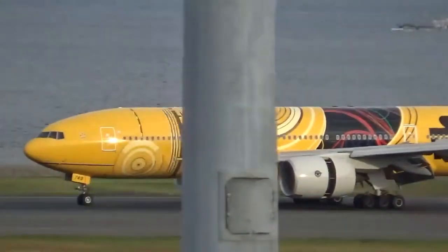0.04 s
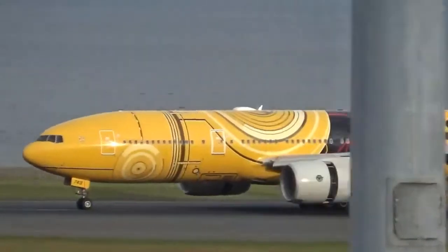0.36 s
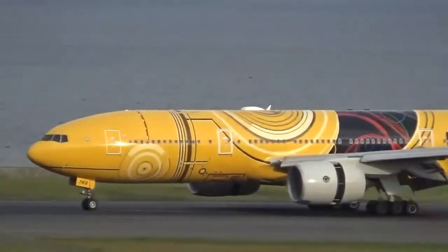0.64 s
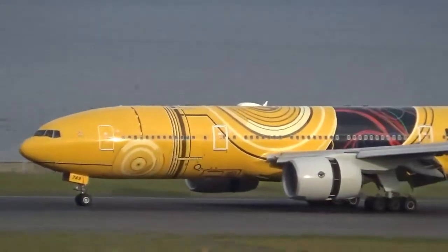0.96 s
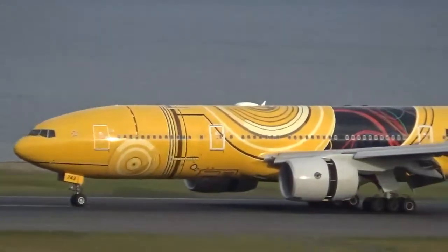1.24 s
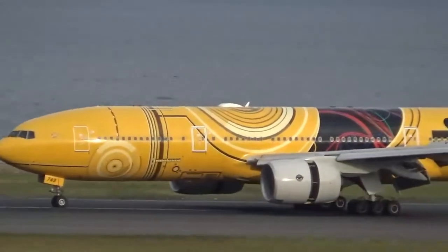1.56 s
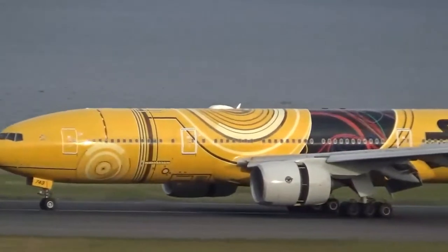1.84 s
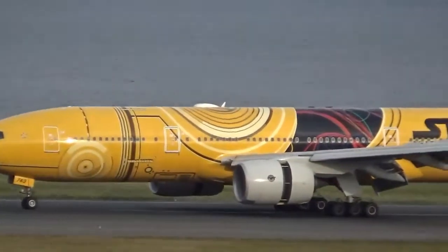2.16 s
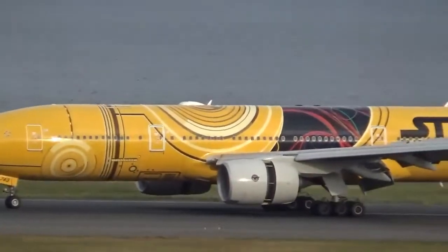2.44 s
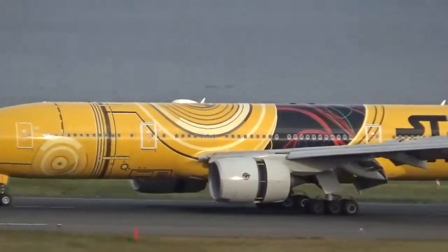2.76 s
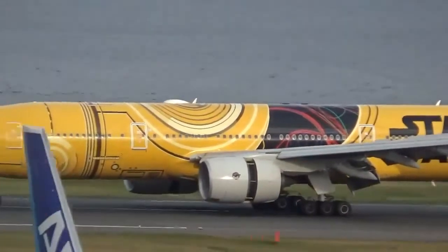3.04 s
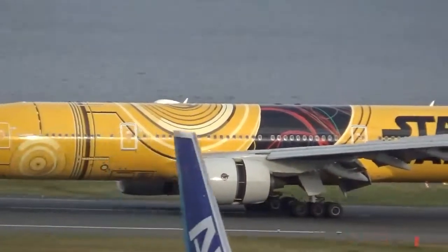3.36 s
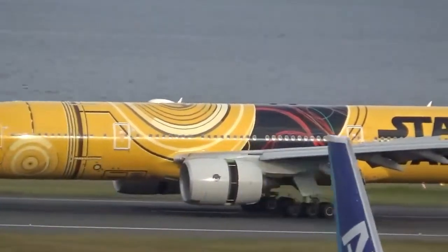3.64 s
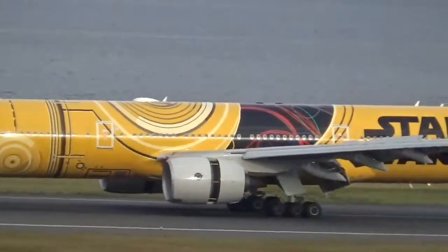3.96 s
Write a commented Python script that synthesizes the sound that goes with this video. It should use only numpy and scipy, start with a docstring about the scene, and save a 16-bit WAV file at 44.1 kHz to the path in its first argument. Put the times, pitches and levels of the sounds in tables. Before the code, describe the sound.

A steady jet engine roar with thin high whines from an airliner on a runway.

```python
"""An airliner rolls along a runway, heard from afar among other jets with their engines at idle.
From the start the exhausts rumble and roar, the intakes rush and hiss, and thin blade tones sink
very slowly in pitch, fading in and out in the moving air. Short puffs of hiss pass at 0.2 and 1.5 s.
Then the deepest rumble grows and low hums swell in turn. From 3 s a high whine is at its loudest."""
import sys
import numpy as np
from scipy import signal
from scipy.fft import rfft, irfft, next_fast_len
from scipy.io import wavfile
from scipy.ndimage import uniform_filter1d, minimum_filter1d, map_coordinates

SR = 44100
rng = np.random.default_rng(int(sys.argv[2]) if len(sys.argv) > 2 else 0)


def transcribe(u):
    """Save the signal u as a 16-bit wav file named by the first command-line argument.

    u: samples, shape (n,) or (channels, n), limited to [-1, 1]; the rate is SR.
    q: integer samples, one column per channel.
    """
    v = np.clip(np.atleast_2d(u).T, -1, 1)
    q = np.round(v * 32767).astype(np.int16)
    wavfile.write(sys.argv[1], SR, q)


N = 176400  # 4 seconds


def amp(db):
    """Turn decibels into a gain to multiply by."""
    return 10 ** (np.asarray(db) / 20)


def unit(x):
    """Scale a signal to an average (rms) level of 1."""
    return x / np.sqrt(np.mean(x ** 2) + 1e-20)


def along(points, hz):
    """Read between the rows of a (Hz, value) table, on a log frequency scale."""
    freqs, values = np.transpose(points)
    return np.interp(np.log(hz + 1), np.log(freqs + 1), values)


def curve(rows):
    """Join (seconds, value) rows with straight lines, one value per sample."""
    return np.interp(np.arange(N) / SR, *np.transpose(rows))


def wobble(rate):
    """A smooth curve through `rate` random points a second."""
    points = rng.standard_normal(int(N * rate / SR) + 4)
    return map_coordinates(points, [np.arange(N) * rate / SR], mode="mirror")


def filtered(x, response):
    """Turn each frequency up or down by the gain response(hz)."""
    size = next_fast_len(N + SR // 2)
    return irfft(rfft(x, size) * response(np.fft.rfftfreq(size, 1 / SR)), size)[..., :N]


def band(hz, half_width_hz):
    """Narrow noise around one pitch, at level 1."""
    return unit(filtered(rng.standard_normal(N), lambda f: 1 / (1 + ((f - hz) / half_width_hz) ** 2)))


# Stereo width. Each row: frequency in Hz, dB of what differs between the ears against what they share.
STEREO_WIDTH = [(30, -26), (80, -30.5), (130, -31), (200, -25.5), (400, -24.5), (600, -28), (900, -33),
                (1300, -26), (1900, -25.5), (2700, -20.5), (4000, -15.5), (5900, -13.5), (7500, -9),
                (8600, -5.5)]
def turbulence(colour, patchy_db):
    """Swirling air: nearly mono noise at level 1, with random louder and softer patches."""
    spectrum = signal.stft(rng.standard_normal((2, N)), nperseg=512)[2]
    patches = uniform_filter1d(rng.standard_normal(spectrum.shape[1:]), size=7, axis=0)  # blur in pitch
    patches = uniform_filter1d(patches, size=18, axis=1)  # blur in time
    pair = signal.istft(spectrum * amp(patchy_db * unit(patches)), nperseg=512)[1][:, :N]
    mid, side = filtered(
        pair, lambda hz: amp(along(colour, hz)) * [np.ones_like(hz), amp(along(STEREO_WIDTH, hz))])
    return unit(np.array([mid + side, mid - side]))


# The breeze's colour. Each row: frequency in Hz, relative strength in dB.
BREEZE_COLOUR = [(10, -12), (25, 0.5), (50, -4), (90, -16), (200, -40), (400, -100)]
def breeze():
    """A faint low flutter of air on the microphone, different on each side."""
    air = filtered(rng.standard_normal((2, N)), lambda hz: amp(along(BREEZE_COLOUR, hz)))
    return amp(-64 + 3 * wobble(3)) * unit(air)


# The puffs. Each row: peak time in seconds, peak level in dB, rise and fall times in seconds.
PUFFS = [(.21, -29.5, 0.015, .06), (1.526, -28.5, 0.012, 0.028)]
# Their colour. Each row: frequency in Hz, relative strength in dB.
PUFF_COLOUR = [(3500, -39), (4700, -5.5), (5600, 9), (6500, 0), (7500, -9.5), (8300, -19), (9200, -52)]
def puffs():
    """The top of the hiss flares up briefly."""
    t = np.arange(N) / SR
    swell = sum(amp(db) * np.exp(-np.maximum((peak - t) / rise, (t - peak) / fall))
                for peak, db, rise, fall in PUFFS)
    return swell * turbulence(PUFF_COLOUR, patchy_db=-3.0)


# Low hums. Each row: pitch and half width in Hz, peak level in dB, peak time and spread in seconds.
HUMS = [(119.5, 14, -25.5, 2.15, 0.38), (99, 9.7, -28.5, 2.69, 0.22), (387, 42, -24, 2.03, 0.29),
        (356, 39, -21, 2.85, 0.051), (261, 30, -27.5, 3.58, .25)]
# The howl's loudness. Each row: time in seconds, level in dB.
HOWL_LEVEL = [(0, -31), (.3, -24.5), (.7, -30), (1.4, -30), (2.1, -29), (2.45, -26), (2.8, -31),
              (3.08, -24.5), (3.3, -36), (4, -25.5)]
def hums_and_howl():
    """Low hums swell in turn, and a soft howl comes and goes above them."""
    t = np.arange(N) / SR
    hums = sum(amp(db) * np.exp(-.5 * ((t - peak) / spread) ** 2) * band(hz, half_width)
               for hz, half_width, db, peak, spread in HUMS)
    howl = amp(curve(HOWL_LEVEL)) * band(841, half_width_hz=35)
    return hums + howl


# Loudness of the intake's layers, low to high. Each row: time in seconds, level in dB.
RUSH_LEVEL = [(0, -20), (0.2, -24.5), (0.38, -21.0), (0.6, -22.5), (1, -23), (1.25, -19.5), (1.6, -21),
              (1.85, -23.5), (2.3, -22), (2.9, -21.5), (3.4, -21), (3.7, -21.5), (3.9, -20.5), (4, -21.5)]
HISS_LEVEL = [(0, -36), (0.15, -35), (0.58, -33.5), (0.72, -35), (1.1, -37), (1.3, -39), (1.5, -35),
              (1.75, -38), (2.1, -34.5), (2.4, -33.5), (2.75, -34.0), (3.1, -32.5), (3.45, -31.5),
              (3.7, -34), (4, -32)]  # before the boost below
FIZZ_LEVEL = [(0, -48.5), (.25, -40), (.45, -36.5), (.6, -36), (1, -54.5), (1.7, -55), (2, -46), (2.3, -48),
              (3, -43), (3.5, -43.5), (4, -38.5)]
# Their colours. Each row: frequency in Hz, relative strength in dB.
RUSH_COLOUR = [(820, -31), (1400, -5), (1520, -4.5), (1720, -1.5), (1950, -4), (2080, -6.5), (2250, -10),
               (2600, -17), (4000, -120)]
HISS_COLOUR = [(1850, -43), (2150, 0.5), (2400, 4), (2680, 3.5), (2900, 1.5), (3100, 1.5), (3300, 3),
               (3700, -3), (4020, -2.5), (4450, -3.5), (4700, -6), (5750, -7.5), (6500, -14), (7500, -21),
               (8200, -27), (8700, -49), (9200, -48.5), (10000, -68.5)]
FIZZ_COLOUR = [(3200, -39.5), (4600, -5), (5600, 5), (6500, -3.5), (7500, -13), (8200, -23), (9000, -54),
               (10000, -82)]
def intake(hiss_boost_db=8):
    """Broad fan noise. Moving air makes the rush and hiss shimmer together, the fizz on its own."""
    shimmer = unit(wobble(9.9) + wobble(35))
    rush = amp(curve(RUSH_LEVEL) + .35 * shimmer) * turbulence(RUSH_COLOUR, patchy_db=.74)
    hiss = amp(curve(HISS_LEVEL) + hiss_boost_db + .6 * shimmer) * turbulence(HISS_COLOUR, patchy_db=1.04)
    fizz = amp(curve(FIZZ_LEVEL) + wobble(18)) * turbulence(FIZZ_COLOUR, patchy_db=3.5)
    return rush + hiss + fizz


def blade_tone(hz, fall_hz_per_s, flutter_db, waver_hz=1.28):
    """Spinning blades make a slowly sinking tone; the air makes it waver, flutter and fray."""
    from_middle_s = (np.arange(N) - N / 2) / SR
    pitch = hz - fall_hz_per_s * from_middle_s + waver_hz * (wobble(7) + wobble(40))
    phase = 2 * np.pi * np.cumsum(pitch) / SR
    mid = np.sin(phase) * amp(flutter_db * unit(wobble(12) + .7 * wobble(45)))
    side = .04 * (wobble(4) * np.sin(phase) + wobble(4) * np.cos(phase))  # differs between the ears
    scattered = amp(-12) * band(hz, half_width_hz=70)  # swirling air turns some of the tone into noise
    return unit(np.array([mid + side, mid - side])) + scattered


# Loudness of each main tone, low to high. Each row: time in seconds, level in dB.
MOAN_LEVEL = [(0, -30), (.85, -37), (1.05, -25), (1.35, -24), (1.6, -23.5), (1.85, -33), (4, -42)]
FAN_LEVEL = [(0, -42.5), (.3, -35), (.58, -28.5), (1, -39.5), (1.35, -41), (1.7, -35.5), (2.1, -30.5),
             (2.4, -37), (2.88, -32), (3.05, -33.5), (3.3, -29.5), (3.62, -26), (4, -35)]
LOW_LEVEL = [(0, -49), (1.7, -50), (1.83, -38.5), (2.3, -31.5), (2.5, -35), (2.95, -31), (3.55, -32),
             (3.85, -35), (4, -34.5)]
SIDE_LEVEL = [(0, -53.5), (1.4, -54), (2.4, -46), (3, -48.5), (3.35, -43), (3.6, -33), (4, -43)]
TWIN_LEVEL = [(0, -50), (0.8, -50.5), (1.2, -39.5), (1.65, -35), (2.5, -37.5), (3.5, -37.5), (4, -37)]
WHINE_LEVEL = [(0, -37.5), (.35, -39), (.58, -34), (1.15, -33.5), (1.5, -36), (1.65, -32), (1.85, -40),
               (2.02, -28.5), (2.2, -42), (2.42, -32.5), (2.68, -32), (2.83, -33.5), (3.03, -25.5),
               (3.55, -24), (3.88, -27.5), (4, -31.5)]
HIGH_LEVEL = [(0, -47.5), (.3, -40), (.55, -33.5), (.9, -38), (1.3, -44.5), (2.29, -46), (2.39, -30.5),
              (2.9, -39.5), (3.05, -32), (3.2, -34), (3.32, -40.5), (3.55, -35), (3.8, -32), (4, -25.5)]
# Main tones. Each row: pitch at 2 s in Hz, fall in Hz per second, flutter in dB, loudness table.
MAIN_TONES = [(859, 8, 1.2, MOAN_LEVEL), (2603.5, 1.8, 1.1, FAN_LEVEL), (3229, 4.2, 1.1, LOW_LEVEL),
              (3290, .6, 1.3, SIDE_LEVEL), (3837.5, .4, 2.4, TWIN_LEVEL), (3872.8, 1.2, 1.1, WHINE_LEVEL),
              (4386, 2, 1.7, HIGH_LEVEL)]
# Faint tones that swell with the hiss. Each row: pitch at 2 s in Hz, dB added to HISS_LEVEL.
FAINT_TONES = [(2045, -1.5), (2683, -12), (2796, -12.5), (3339, -16), (4405, -11.5), (4931, -20),
               (5271, -15.5), (5820, -21.5), (6668, -22.5)]
# A breathy whistle just above the main whine. Each row: time in seconds, level in dB.
WHISTLE_LEVEL = [(0, -61), (2.4, -52), (3, -43), (4, -43.5)]
def blades(beat_hz=11, second_fan_db=-12.5):
    """Fans and compressors of several engines whine; two fans at nearly the same speed throb together."""
    main = sum(amp(curve(level)) * blade_tone(hz, fall, flutter)
               for hz, fall, flutter, level in MAIN_TONES)
    hz, fall, flutter, level = MAIN_TONES[1]  # the first fan
    second_fan = amp(curve(level) + second_fan_db) * blade_tone(hz - beat_hz, fall, flutter)
    faint = sum(amp(db) * blade_tone(hz, fall_hz_per_s=2.105, flutter_db=2.5, waver_hz=3.1)
                for hz, db in FAINT_TONES)
    whistle = amp(curve(WHISTLE_LEVEL)) * band(4080, half_width_hz=55)
    return main + second_fan + amp(curve(HISS_LEVEL)) * faint + whistle


# Loudness of the exhaust's layers, low to high. Each row: time in seconds, level in dB.
DEEP_LEVEL = [(0, -45), (.9, -40.5), (1.4, -39.5), (1.62, -31.5), (2.2, -35), (2.5, -33), (2.88, -31.5),
              (3.08, -39.5), (4, -34.5)]  # grows as the engines pass
RUMBLE_LEVEL = [(0, -32), (0.55, -24.5), (0.8, -30), (1.1, -28), (1.4, -33), (1.65, -23.5), (2, -28),
                (2.35, -23.5), (2.85, -27.5), (3.15, -29), (3.55, -24), (4, -30.5)]
ROAR_LEVEL = [(0, -23), (0.15, -21), (0.38, -20), (0.56, -23), (0.7, -19.5), (0.86, -21.5), (1, -17.5),
              (1.25, -24), (1.5, -22), (1.75, -20), (2.15, -19), (2.55, -21), (2.85, -21), (3.2, -22.5),
              (3.65, -23.5), (4, -23.5)]
BLAST_LEVEL = [(0, -17.5), (0.25, -18), (0.5, -17.5), (0.85, -17.5), (1.25, -16.5), (1.8, -16.0),
               (2.3, -17.5), (2.7, -18.5), (3.05, -18.5), (3.55, -19.5), (4, -17.5)]
# Their colours. Each row: frequency in Hz, relative strength in dB.
DEEP_COLOUR = [(12, -43.5), (25, -14), (45, -5.5), (70, 4.5), (100, -4), (160, -42), (300, -120)]
RUMBLE_COLOUR = [(13, -58), (25, -28.5), (45, -23.5), (80, -3.5), (105, 1), (130, 2.5), (170, -8),
                 (230, -34), (390, -120)]
ROAR_COLOUR = [(100, -40), (175, -7.5), (235, -2.5), (305, -2.5), (350, 1), (385, -0.5), (440, 0),
               (510, -6), (680, -34.5), (1140, -120)]
BLAST_COLOUR = [(310, -33.5), (510, -5.5), (570, -2), (730, 0), (860, -1.5), (1020, -1.5), (1250, -4),
                (1400, -7.5), (1820, -38.5), (3080, -120)]
def exhaust():
    """The jets mix with the air around them: a deep rumble, a hollow roar and the blast above it."""
    layers = [(DEEP_LEVEL, DEEP_COLOUR), (RUMBLE_LEVEL, RUMBLE_COLOUR),
              (ROAR_LEVEL, ROAR_COLOUR), (BLAST_LEVEL, BLAST_COLOUR)]
    return sum(amp(curve(level)) * turbulence(colour, patchy_db=.5) for level, colour in layers)


# Balance between the ears. Each row: frequency in Hz, left minus right in dB.
BALANCE = [(60, 0), (130, -0.6), (210, -.2), (330, -0.8), (480, -0.98), (750, 0.05), (1340, 0), (2500, 0),
           (4600, 0.6), (8600, 1)]
def scene():
    """All the engines and the breeze together, leaning a little left or right."""
    mix = exhaust() + hums_and_howl() + intake() + blades() + puffs() + breeze()
    return filtered(mix, lambda hz: amp(np.array([[.5], [-.5]]) * along(BALANCE, hz)))


def record(dry):
    """A limiter holds down the highest peaks, then the highest treble is cut away."""
    ceiling_db, reaction_s, top_hz = -3.4, 0.0037, 9300
    span = int(reaction_s * SR)
    needed_gain = np.minimum(1, amp(ceiling_db) / (np.abs(dry).max(axis=0) + 1e-9))
    smooth_gain = uniform_filter1d(minimum_filter1d(needed_gain, span), span)
    return filtered(dry * smooth_gain, lambda hz: hz < top_hz)


dry = scene()
out = record(dry)
transcribe(out)
```